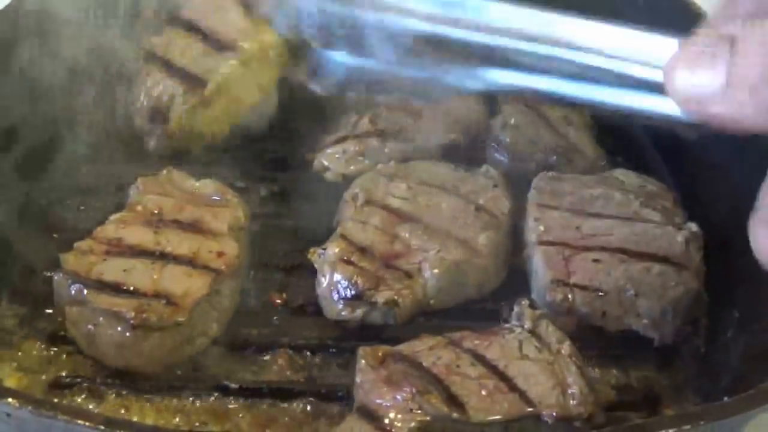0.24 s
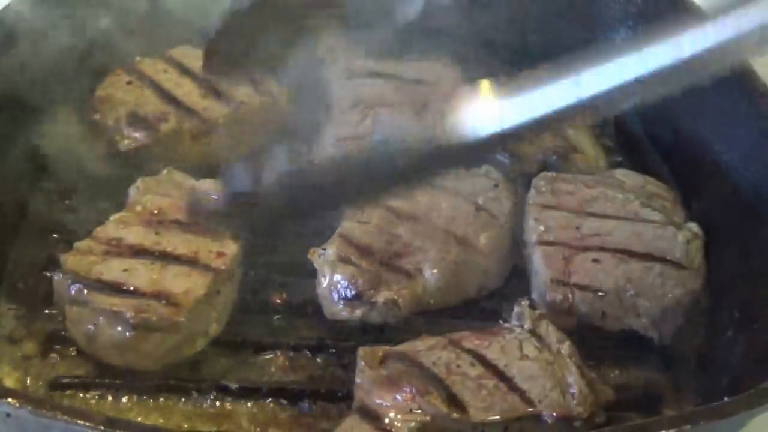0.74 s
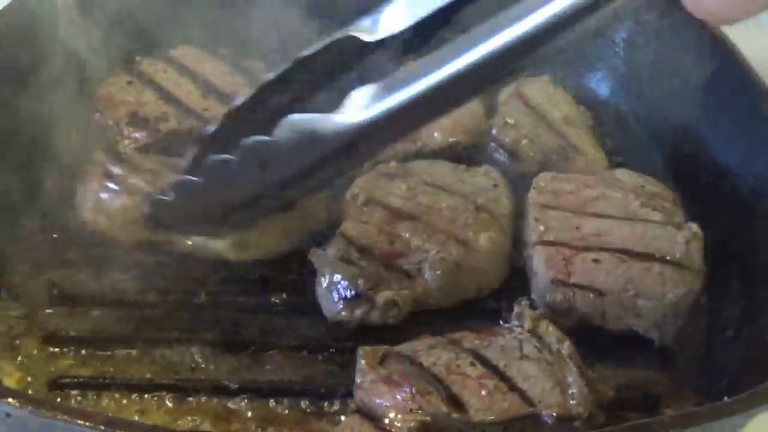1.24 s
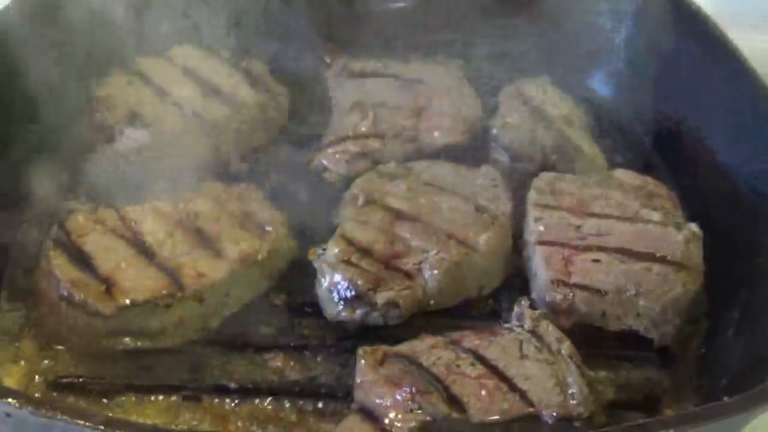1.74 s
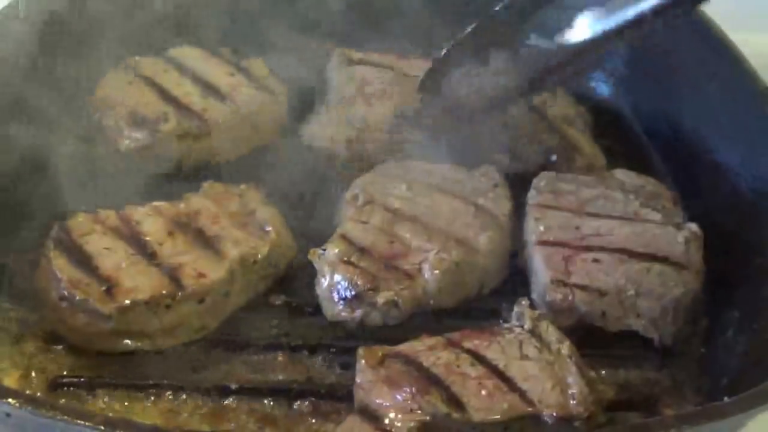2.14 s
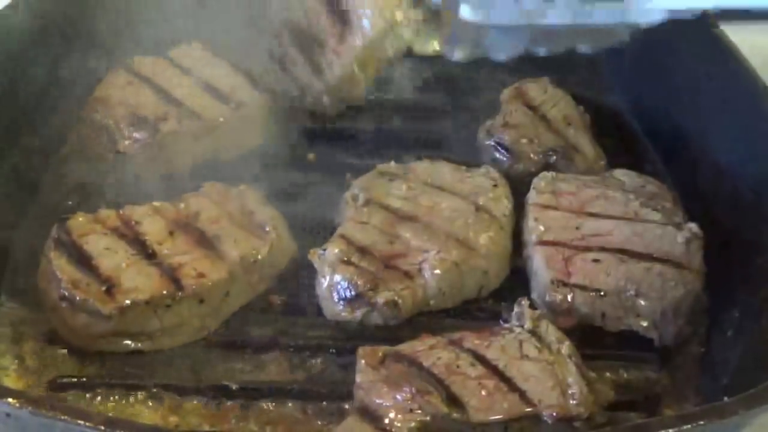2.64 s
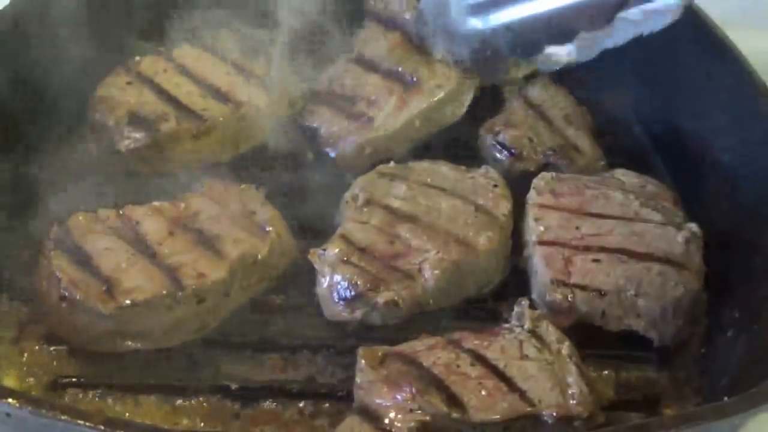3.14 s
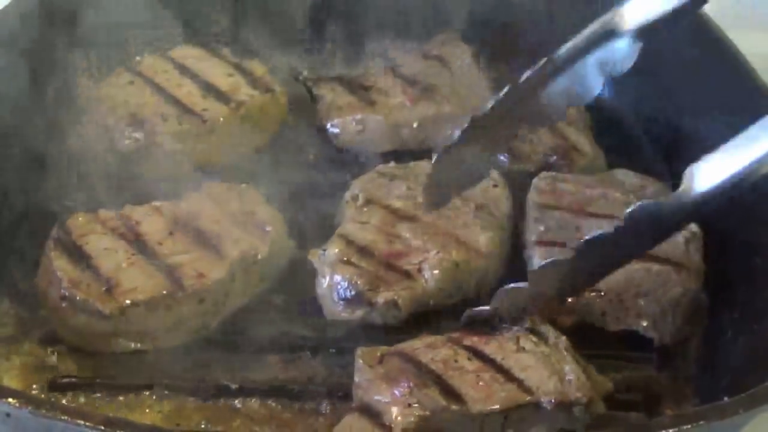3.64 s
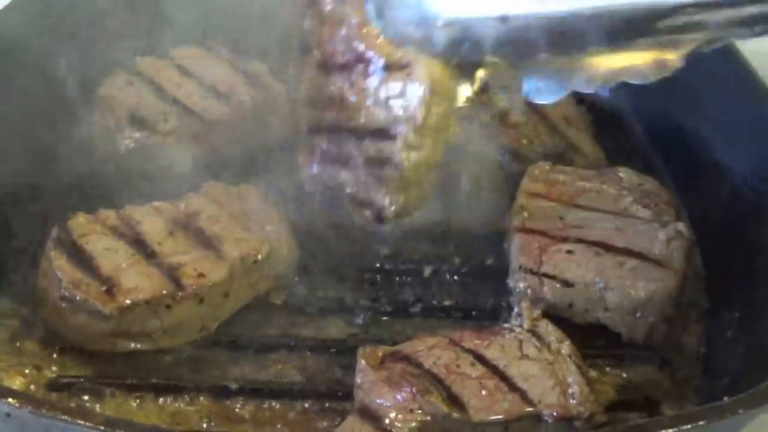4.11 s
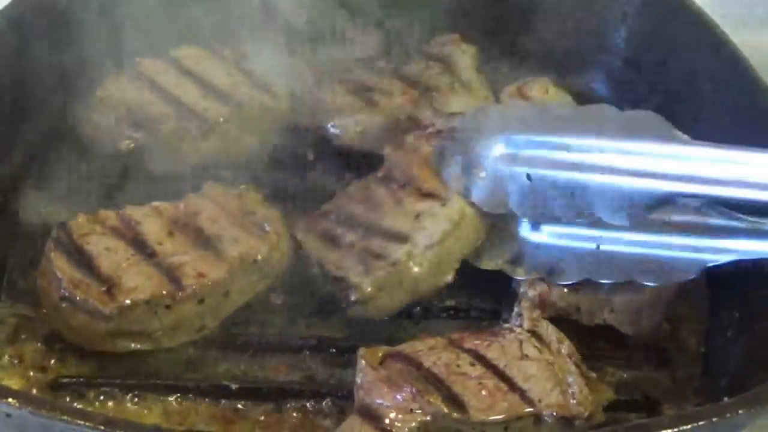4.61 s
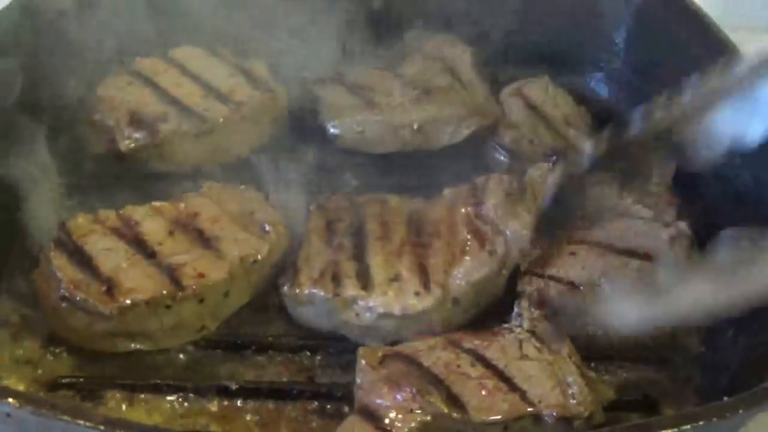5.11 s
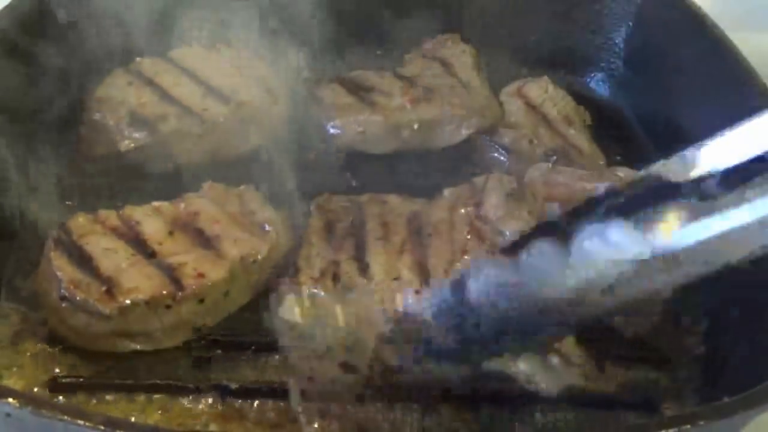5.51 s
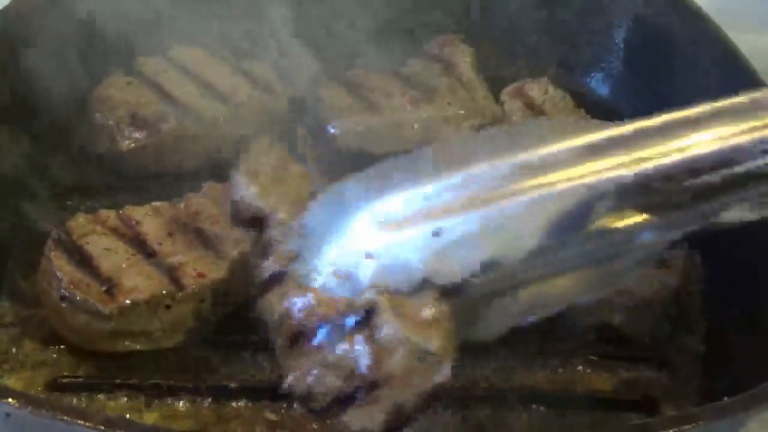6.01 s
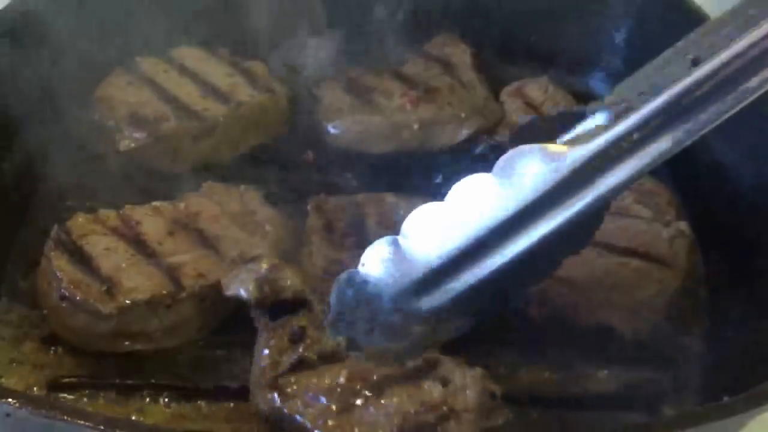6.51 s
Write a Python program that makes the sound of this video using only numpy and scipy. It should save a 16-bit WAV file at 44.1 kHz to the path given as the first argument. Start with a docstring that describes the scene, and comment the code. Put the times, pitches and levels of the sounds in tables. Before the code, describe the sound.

Meat sears in a ridged pan very close by, in a kitchen with a short diffuse wash. For almost seven seconds a bright, dense sizzle runs unbroken: tiny ringing bubbles, sharp oil ticks and coloured hiss, over a barely audible stove rumble. Around 0.5 s a wet side lands, two drops spit sharply, and a fuzzy high steam whistle slides slightly down until 1.2 s. Juice bubbles lower and fuller near 1.5 s with a short whistle; the strongest landing surges at 1.6 s, followed by overlapping thin whistles until about 2.5 s. The frying then continues steadily. From 3.3 s squeezes and landings swell it again, near 3.5, 4.5 and 5.1 s, with a brief steam jet at 3.8 s, spits around 4.8 s and a longer falling hiss from 5.3 to 6 s. After 6 s, a snappy drop, clustered spits and short whistles crowd together while the sizzle goes on.

```python
"""From the start, meat sears in a ridged pan, close by in a kitchen: bursting bubbles ring, oil films tick
and both merge into coloured hiss. Within the first half second tongs push the meat and a wet face lands:
boiling surges, juice drops spit as ragged rings, and trapped steam whistles as gliding narrow noise, on
and off until 2.5 s. A squeeze near 1.5 s and the strongest landing at 1.6 s follow; more of both come from
about 3.3 s, with whistles and spits that crowd after 6 s. Filtered noise is a low stove rumble throughout;
a short diffuse wash is the kitchen."""
import sys
import numpy as np
from scipy import signal
from scipy.fft import rfft, irfft, next_fast_len
from scipy.io import wavfile
from scipy.ndimage import uniform_filter1d, minimum_filter1d

SR = 44100
rng = np.random.default_rng(int(sys.argv[2]) if len(sys.argv) > 2 else 0)


def master_out(mix):
    """Clip the mix to full scale and print it as 16-bit PCM to the path in sys.argv[1]."""
    frames = np.transpose(np.atleast_2d(mix))
    ceiling = np.clip(frames, -1, 1)
    pcm = np.round(ceiling * 32767).astype(np.int16)
    wavfile.write(sys.argv[1], SR, pcm)


N = 297675

# Colour of the frying. Each row: frequency in Hz, relative level per Hz in dB.
FRYING_COLOUR = [(150, -48), (350, -43), (600, -30), (1000, -29), (1400, -18.5), (2100, -13.5),
                 (2800, -5.5), (3500, -5), (4500, -3), (6300, -1.0), (7200, -1), (8700, -1.26),
                 (9600, -0.2), (11000, -4.5)]
# Resonances and notches of pan and hob. Each row: centre in Hz, width in Hz, boost or cut in dB.
PAN_RESONANCES = [(555, 81, 3.5), (857, 82, 5.5), (960, 50, 0.5), (1001, 35, 6.5), (1136, 49, 6),
                  (1190, 44, -5.5), (1480, 230, 1.5), (1640, 130, -4.5), (1755, 110, 1.5), (2330, 250, -2),
                  (2580, 140, -0.5), (2760, 120, -2), (2940, 77, -5.5), (4480, 240, 1.1)]
# Steam escaping under the meat. Each row: start in seconds, end in seconds, start pitch in Hz,
# end pitch in Hz, noise width in Hz, level before the fades in dB.
STEAM_JETS = [(.38, 1.219, 6600, 6250, 700, -31), (1.421, 1.505, 6230, 6300, 450, -24),
              (1.621, 1.95, 4860, 4700, 750, -33.5), (1.779, 2.153, 5170, 5110, 330, -27.5),
              (2.079, 2.451, 4910, 4650, 330, -29), (3.78, 3.97, 6500, 6500, 900, -25.5),
              (4.785, 4.882, 2900, 2950, 450, -35), (5.3, 6.03, 6400, 5900, 900, -29),
              (5.391, 5.48, 1038, 1013, 200, -48), (6.152, 6.24, 3400, 3576, 760, -22.5),
              (6.185, 6.355, 4390, 4460, 400, -27), (6.392, 6.503, 4790, 4780, 600, -23)]
# Juice drops spitting in the oil. Each row: start in seconds, pitch in Hz, level of the decay at its
# start in dB, time to fall 60 dB in seconds.
JUICE_SPITS = [(0.501, 3030, -3, 0.01), (.564, 3020, -7.5, 0.014), (1.450, 1900, -21, .015),
               (3.353, 1910, -23, .025), (3.881, 900, -28, 0.013), (4.799, 2860, -11, 0.027),
               (4.869, 3000, -11, 0.017), (5.381, 3480, -9, 0.0045), (6.019, 1950, -19.5, .025),
               (6.1425, 6200, 2, 0.0033), (6.163, 3400, -11, 0.023), (6.186, 3700, -11, .01),
               (6.395, 2160, -18, 0.02), (6.396, 2900, -10, 0.017), (6.477, 950, -33, 0.021),
               (6.485, 1800, -18, 0.013)]
# Colour of the stove rumble. Each row: frequency in Hz, relative level per Hz in dB.
RUMBLE_COLOUR = [(15, 3.5), (40, 0), (75, -2), (130, -0.5), (260, 2), (450, 3), (1000, -2.5), (4000, -50)]
# Kitchen wash against the direct sound. Each row: frequency in Hz, level in dB.
KITCHEN_RETURN = [(30, -16), (120, -12), (500, -14), (1200, -7), (2500, -7), (5000, -11), (10000, -12)]
# Colour difference of the channels. Each row: frequency in Hz, left minus right in dB.
LEFT_BALANCE = [(100, -0.5), (1000, 0.3), (3000, -.5), (4300, -0.16), (7000, 0.8), (9700, -0.04)]
# Wet faces meeting the iron. Each row: start in seconds, bubble pitch in Hz, surge in dB.
MEAT_LANDINGS = [(.45, 2970, 1), (1.6, 4880, 4), (3.48, 4070, 2.2), (4.45, 3650, 1.5), (5.1, 3200, 0.7),
                 (6.08, 3420, 1.5)]
# Tongs squeezing out juice, which boils in large bubbles. Each row: middle in seconds,
# length in seconds, swell in dB.
TONG_SQUEEZES = [(.35, 0.89, 2), (0.947, 0.99, 2.5), (1.495, 0.49, 3.5), (3.353, 0.17, 4.5),
                 (4.053, 0.74, 3), (4.6, 0.63, 1), (5.45, 1, 1.3), (6.01, 0.31, 1.5), (6.43, 0.83, 3.5)]
# Course of the finest fizz. Each row: time in seconds, level change in dB.
FIZZ_COURSE = [(0, 0.6), (.95, -0.7), (1.58, 1.5), (2.12, -0.5), (3.48, 1.6), (3.95, 0), (4.17, 2.8),
               (4.42, 0.8), (5.65, 0.1), (6.75, -0.8)]

EDGE_HZ = 11070
FRAME = 512  # samples per spectral frame, half overlapped
SURGE_RISE_S, SURGE_FADE_S, SURGE_OCTAVES = 0.11, 1.94, 0.28
# wet meat cools the oil, so small bubbles weaken for a moment (share of the surge in dB)
QUENCH_SHARE, QUENCH_FADE_S, QUENCH_HZ, QUENCH_OCTAVES = 0.78, 0.67, 6640, 0.22
JUICE_HZ, JUICE_OCTAVES = 1330, 0.75
FIZZ_HZ, FIZZ_OCTAVES = 9500, 0.24


def amp(db):
    """Decibels to gain."""
    return 10 ** (np.asarray(db) / 20)


def unit(x):
    """Scales to rms 1."""
    return x / np.sqrt(np.mean(x ** 2) + 1e-20)


def read(points, hz):
    """Interpolates a spectrum table on a log-frequency axis."""
    table_hz, value = np.transpose(points)
    return np.interp(np.log(hz + 1), np.log(table_hz + 1), value)


def add(mix, start_s, sound):
    """Mixes a sound in at its start, cut at the end of the mix."""
    part = mix[round(start_s * SR):][:len(sound)]
    part += sound[:len(part)]


def colour(x, points, peaks=()):
    """Filters by a smooth spectrum plus bell-shaped peaks and notches."""
    size = next_fast_len(N + 4096)
    hz = np.fft.rfftfreq(size, 1 / SR)
    db = read(points, hz)
    for centre_hz, width_hz, peak_db in peaks:
        db = db + peak_db / (1 + (2 * (hz - centre_hz) / width_hz) ** 2)
    return irfft(rfft(x, size) * amp(db), size)[..., :N]


def wander(rate_hz, size=N, slowest_hz=0):
    """Random curve of rms 1: Gaussian roll-off above, 1/e at rate_hz; nothing below slowest_hz."""
    hz = np.fft.rfftfreq(size, 1 / SR)
    weight = np.exp(-(hz / rate_hz) ** 2) * (hz >= slowest_hz)
    return unit(irfft(rfft(rng.standard_normal(size)) * weight, size))


def sizzle(level_db=-17.5, hiss_db=-2, snap_db=-7, flutter_db=0.2, flutter_hz=35, slowest_hz=11):
    """Bubbles, ticks and merged hiss, coloured by the pan; bubble sizes shift as the meat is moved."""
    fry = bubbles() + amp(snap_db) * snaps() + amp(hiss_db) * rng.standard_normal(N)
    flutter = amp(flutter_db * wander(flutter_hz, slowest_hz=slowest_hz))
    fry = colour(fry * flutter, FRYING_COLOUR, PAN_RESONANCES)
    hz, t, spectrum = signal.stft(fry, SR, nperseg=FRAME)
    spectrum = spectrum * amp(boiling(hz, t))
    spectrum = spectrum * (hz < EDGE_HZ + 500)[:, None]
    fry = signal.istft(spectrum, SR, nperseg=FRAME)[1][:N]
    return amp(level_db) * unit(fry)


def bubbles(per_s=11000, spread_db=3.5, ring_cycles=8, clump_db=2.5, clump_hz=28, slowest_hz=6, count=30):
    """Bursting bubbles ring, falling 60 dB in ring_cycles; small ones are commonest, each size clumps."""
    pitches_hz = np.geomspace(300, 11500, count)
    t, out = np.arange(1024) / SR, np.zeros(N)
    for hz, share in zip(pitches_hz, pitches_hz / pitches_hz.sum()):
        at = np.flatnonzero(rng.random(N) < per_s * share / SR)
        sizes = amp(spread_db * np.minimum(rng.exponential(1, len(at)), 4))
        bursts = np.zeros(N)
        bursts[at] = sizes * rng.choice([-1, 1], len(at))
        ring = np.sin(2 * np.pi * hz * t) * amp(-60 * hz * t / ring_cycles)
        clumps = amp(clump_db * wander(clump_hz, slowest_hz=slowest_hz))
        ringing = signal.oaconvolve(bursts * clumps, ring)[:N]
        out += np.sqrt(share) * unit(ringing)
    return unit(out)


def snaps(per_s=380, spread_db=2.5, lowest_hz=700):
    """Sharp, broad ticks of oil films tearing; too small to carry bass."""
    sizes = amp(spread_db * np.minimum(rng.exponential(1, N), 3))
    ticks = sizes * rng.choice([-1, 1], N) * (rng.random(N) < per_s / SR)
    high_pass = signal.butter(2, lowest_hz, "high", fs=SR, output="sos")
    return unit(signal.sosfilt(high_pass, ticks))


def boiling(hz, t):
    """Relative boiling level (dB) by bubble pitch and time as the meat is laid down and squeezed."""
    fizz_db = np.interp(t, *np.transpose(FIZZ_COURSE))
    db = np.outer(around(hz, FIZZ_HZ, FIZZ_OCTAVES), fizz_db)
    quenched = around(hz, QUENCH_HZ, QUENCH_OCTAVES)
    for start_s, pitch_hz, surge_db in MEAT_LANDINGS:
        age_s = t - start_s
        surging = around(hz, pitch_hz, SURGE_OCTAVES)
        db += surge_db * np.outer(surging, surge(age_s, SURGE_FADE_S))
        db -= surge_db * QUENCH_SHARE * np.outer(quenched, surge(age_s, QUENCH_FADE_S))
    for middle_s, length_s, swell_db in TONG_SQUEEZES:
        push = np.cos(np.pi * np.clip((t - middle_s) / length_s, -0.5, 0.5)) ** 2
        db += swell_db * np.outer(around(hz, JUICE_HZ, JUICE_OCTAVES), push)
    return db


def around(hz, centre_hz, octaves):
    """Bell of height 1 over the bubble sizes near one pitch."""
    return np.exp(-0.5 * (np.log2((hz + 1) / centre_hz) / octaves) ** 2)


def surge(age_s, fade_s):
    """Quick rise and slow exponential fade after a landing."""
    rise = np.clip(age_s / SURGE_RISE_S, 0, 1)
    return rise * np.exp(-np.maximum(age_s - SURGE_RISE_S, 0) / fade_s)


def steam(sputter_db=1.0, sputter_hz=130):
    """Steam squeezes through a gap under the meat: a fuzzy, sputtering whistle that may glide."""
    out = np.zeros(N)
    for start_s, end_s, start_hz, end_hz, width_hz, db in STEAM_JETS:
        size = round((end_s - start_s) * SR)
        phase = 2 * np.pi * np.cumsum(np.linspace(start_hz, end_hz, size)) / SR
        # two random carriers in quadrature make narrow noise around the pitch
        whistle = wander(width_hz, size) * np.cos(phase) + wander(width_hz, size) * np.sin(phase)
        whistle *= amp(sputter_db * wander(sputter_hz, size))
        fades = signal.windows.tukey(size, 0.5)
        add(out, start_s, amp(db) * unit(whistle) * fades)
    return out


def spits(rough=1.4, fizz_hz=750):
    """A drop flashes to steam: a short, ragged ring with a soft start."""
    out, t = np.zeros(N), np.arange(4096) / SR
    for start_s, hz, db, t60_s in JUICE_SPITS:
        phase = 2 * np.pi * hz * t
        fizz = wander(min(fizz_hz, hz / 3), len(t))
        ring = (np.sin(phase) + rough * fizz * np.cos(phase)) / np.hypot(1, rough)
        soft_start = 1 - np.exp(-(t * hz) ** 2)
        add(out, start_s, ring * amp(db - 60 * t / t60_s) * soft_start)
    return out


def stove(level_db=-62.5, waver_db=2.0, waver_hz=12):
    """Low rumble: coloured noise that wavers in level."""
    rumble = colour(rng.standard_normal(N), RUMBLE_COLOUR)
    return amp(level_db) * unit(rumble * amp(waver_db * wander(waver_hz)))


def kitchen(x, t60_s=0.11):
    """Hob, walls and cupboards scatter the sound into a dying wash, different on each side."""
    spectrum = signal.stft(x, SR, nperseg=FRAME)[2]
    hop_s = FRAME / 2 / SR
    keep = amp(-60 * hop_s / t60_s) ** 2  # power left after one hop
    power = signal.lfilter([1 - keep], [1, -keep], abs(spectrum) ** 2)
    scatter = signal.stft(rng.standard_normal((2, N)), SR, nperseg=FRAME)[2]
    wash = signal.istft(scatter * np.sqrt(power), SR, nperseg=FRAME)[1][:, :N]
    return colour(unit(wash) * np.std(x), KITCHEN_RETURN)


def scene():
    """The pan sits straight ahead; each side adds its own wash."""
    direct = sizzle() + steam() + spits() + stove()
    left, right = direct + kitchen(direct)
    return np.array([colour(left, LEFT_BALANCE), right])


def record(dry, ceiling=0.53):
    """A fast limiter holds down the highest peaks, then a steep low-pass ends the band."""
    allowed = ceiling / np.maximum(abs(dry).max(0), ceiling)
    gain = minimum_filter1d(allowed, size=70)
    gain = uniform_filter1d(uniform_filter1d(gain, size=70), size=70)
    low_pass = signal.firwin(1501, EDGE_HZ, window=("kaiser", 10), fs=SR)
    return signal.oaconvolve(dry * gain, low_pass[None], "same")


dry = scene()
out = record(dry)
master_out(out)
```